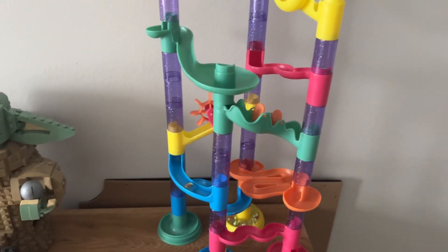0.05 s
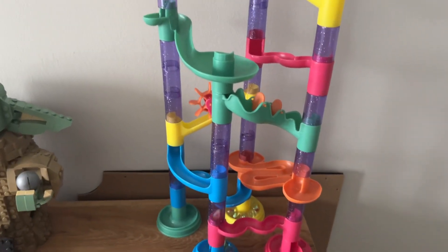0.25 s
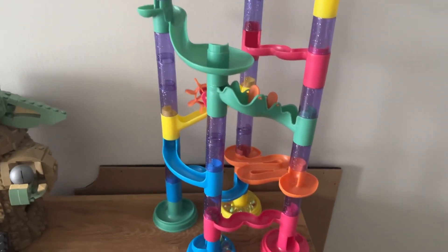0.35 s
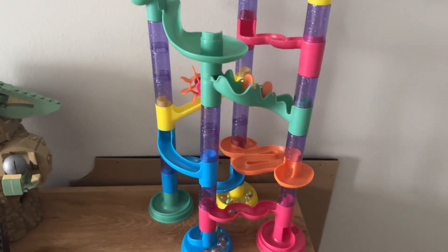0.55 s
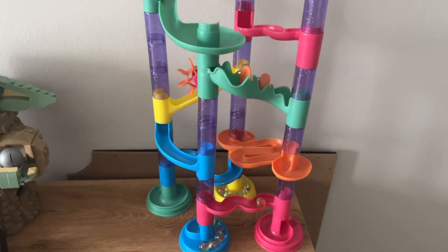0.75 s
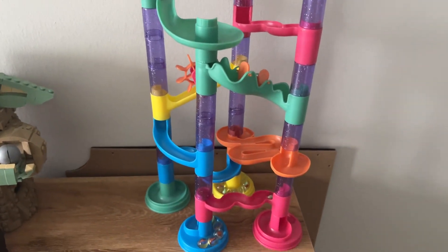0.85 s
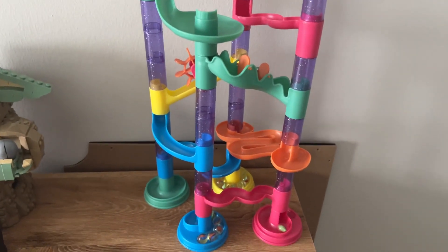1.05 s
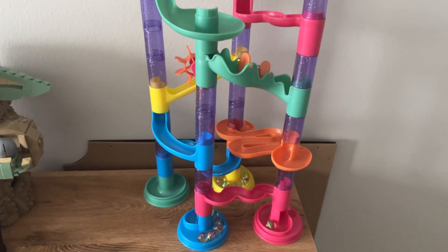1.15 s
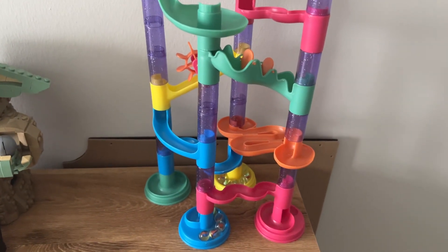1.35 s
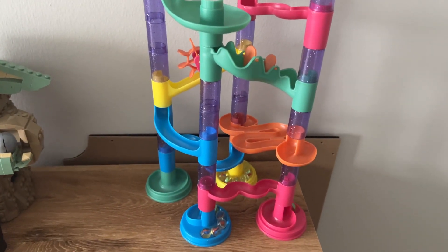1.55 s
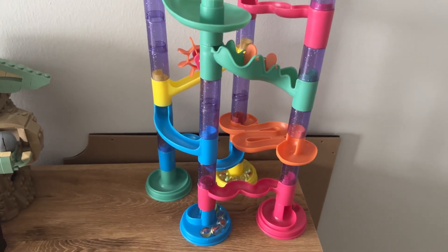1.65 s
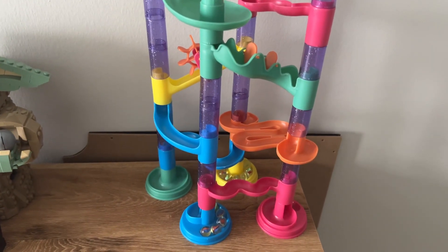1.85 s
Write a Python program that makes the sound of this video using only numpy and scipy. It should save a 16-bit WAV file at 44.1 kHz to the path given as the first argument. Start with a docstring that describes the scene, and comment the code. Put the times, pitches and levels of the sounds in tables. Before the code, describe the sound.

Glass marbles clack and roll down a plastic toy track in a quiet room.

```python
"""In a quiet room, glass marbles run down a plastic toy track on a wooden table.
They drop through tubes and bounce on the chutes and in the round base. Each blow makes the plastic
ring and clack, the glass tick and the table thump. Tiny bumps under the rolling marbles add a faint
rattle, and the room gives a short echo. One marble whirrs round the bowl, then the rolling dies away."""
import sys
import numpy as np
from scipy import signal
from scipy.fft import rfft, irfft
from scipy.io import wavfile

SR = 44100
rng = np.random.default_rng(int(sys.argv[2]) if len(sys.argv) > 2 else 0)


def log_audio(samples):
    """Write samples as a 16-bit WAV file to the path given in sys.argv[1]."""
    # one column per channel
    frames = np.atleast_2d(samples).T
    # limit to full scale, then quantise
    limited = np.clip(frames, -1, 1)
    pcm = np.round(limited * 32767).astype(np.int16)
    wavfile.write(sys.argv[1], SR, pcm)


N = 83790
TIME = np.arange(N) / SR


def from_db(db):
    """Turn decibels into a number to multiply a sound by."""
    return 10 ** (np.asarray(db) / 20)


def rms_one(x):
    """Scale a sound so that its average power is 1."""
    return x / np.sqrt(np.mean(x ** 2) + 1e-20)


def at_hz(points, hz):
    """Read between the rows of a table, giving every octave the same width."""
    freqs, values = np.transpose(points)
    return np.interp(np.log(np.maximum(hz, 1)), np.log(freqs), values)


def dying(t60):
    """A fade that starts at 1 and drops 60 dB every t60 seconds."""
    return from_db(-60 * TIME / t60)


def convolve(x, response):
    """Let every sample of x set off its own copy of a stereo response."""
    return signal.fftconvolve(np.atleast_2d(x), response, axes=1)[:, :N]


# How alike left and right sound: f/Hz, likeness (1 the same, -1 opposite)
LIKENESS = [(100, 0.92), (500, 0.66), (1400, -0.096), (3000, 0.058), (4800, -0.34), (6500, 0.63),
            (9000, -0.69), (12000, 0.14)]
def noise(colour, likeness=LIKENESS):
    """Stereo noise; its colour table says how strong the low and high pitches are."""
    hz = np.arange(N // 2 + 1) * SR / N
    mid, side = rfft(rng.standard_normal((2, N)))
    alike = np.clip(at_hz(likeness, hz), -1, 1)
    left_right = np.sqrt(1 + alike) * mid + np.sqrt(1 - alike) * side * [[1], [-1]]
    return rms_one(irfft(from_db(at_hz(colour, hz)) * left_right, N))


def bursts(times, levels_db, colour, rise_s, t60):
    """Tones too crowded to tell apart sound like noise: each blow swells it, then it fades."""
    power = np.zeros(N)
    np.add.at(power, (np.array(times) * SR).astype(int), from_db(levels_db) ** 2)
    shape = np.minimum(TIME / rise_s, 1) * dying(t60)
    loudness = np.sqrt(np.abs(signal.fftconvolve(power, shape ** 2)[:N]))
    return loudness * noise(colour)


def thin(x):
    """Cut the bass, as small plastic parts give off little below their lowest tones."""
    return signal.sosfilt(signal.butter(5, 1020, "high", fs=SR, output="sos"), x)


# Marbles hitting the track: t/s, part hit, ring level/dB, clack level/dB, tick level/dB
# (levels in all tables are relative: the functions scale them)
BLOWS = [(0.0, "chute", -31, -28, -56), (0.163, "chute", -29.5, -37, -61),
         (0.2098, "tube", -15.5, -17, -32), (0.2237, "tube", -15, -21.5, -36.5),
         (0.248, "chute", -26, -20, -30), (0.275, "chute", -28, -11.5, -23),
         (0.2826, "chute", -10, -13, -23.5), (.292, "chute", -12.5, -28, -29),
         (0.3009, "chute", -7.5, -16.5, -24.5), (0.307, "chute", -13, -20, -22.5),
         (0.3213, "chute", -12.5, -18.5, -29.5), (0.334, "chute", -21, -47, -51),
         (0.361, "chute", -18.5, -33, -66), (0.489, "chute", -31.5, -42, -78),
         (0.6757, "bowl", -45, -35.5, -65), (0.687, "chute", -34, -42, -62),
         (0.795, "base", -35.5, -42, -64), (0.823, "bowl", -45.5, -62, -51.5),
         (0.8372, "base", -35, -48, -65), (0.8441, "base", -25.5, -32.5, -45),
         (0.9129, "base", -34, -42, -75), (.940, "tube", -15.5, -18, -26),
         (0.9806, "base", -10, -12, -20.5), (1.005, "base", -31.5, -28.5, -47.5),
         (1.022, "base", -34.5, -37.5, -59.5), (1.0464, "bowl", -21, -35, -32.5),
         (1.0613, "base", -10.5, -17, -20), (1.084, "bowl", -23, -26.5, -41.5),
         (1.102, "base", -23, -31.5, -42), (1.272, "bowl", -34.5, -42.5, -53.5),
         (1.4277, "bowl", -26, -33, -47.5), (1.435, "base", -29, -36, -49.5),
         (1.49, "bowl", -27, -36.5, -48.5), (1.4948, "bowl", -21, -28, -45.5),
         (1.527, "base", -31, -42, -58), (1.578, "bowl", -37.5, -63.5, -80),
         (1.616, "bowl", -40, -61.5, -83), (1.628, "base", -36.5, -73.5, -64),
         (1.670, "base", -43, -71.5, -87)]
def marble_blows():
    """Each hit makes four sounds at once: a ring, a clack, a tick and a thump."""
    times, _, ring_db, _, tick_db = zip(*BLOWS)
    rings = np.zeros((2, N + SR))
    for start_s, part, force_db, _, _ in BLOWS:
        ring = plastic_ring(part, force_db)
        start = int(start_s * SR)
        rings[:, start:start + ring.shape[1]] += from_db(1) * ring
    return rings[:, :N] + plastic_clacks(BLOWS) + glass_ticks(times, tick_db) + thumps(times, ring_db)


RING_T60_S, LEFT_LEAD_S = .033, .00005   # how fast a ring fades; the left side hears it a bit sooner
# The tones that each plastic part rings with: f/Hz, level/dB
PART_TONES = {"tube": [(1190, -6), (1370, -7), (1630, -5.5), (2550, -10), (3080, -12.5), (4470, -13),
              (6100, -3), (6720, 0)], "chute": [(1032, -19), (1205, -15.5), (1338, -7), (1475, -4),
              (1710, -5), (2550, -12), (3300, -14), (4720, -10.5), (4975, -11.5), (6005, -9.5),
              (6495, -11.5)], "base": [(1160, -11.5), (1430, -4.5), (1600, 1), (1895, -6), (2185, -8),
              (3000, -13.5), (3290, -10), (4500, -7), (6280, -13.5)], "bowl": [(1020, -9), (1160, -7),
              (1280, -4), (1475, -1.5), (1765, -13.5), (1920, -1), (2250, -5.5), (3300, -7.5)]}
def plastic_ring(part, force_db, pitch=1):
    """A part rings; the spot hit sets each tone's strength and how it reaches left and right."""
    count = SR // 5
    tones, t = np.zeros((2, count)), TIME[:count]
    for hz, db in PART_TONES[part]:
        strength, phase, spread, detune = rng.standard_normal(4)
        hz = hz * pitch * (1 + .01 * detune)
        side_gap_rad = 2 * np.pi * hz * LEFT_LEAD_S + .35 * hz / 1500 * np.tanh(2 * spread)
        side_phases = .5 * phase + side_gap_rad * np.array([[.5], [-.5]])
        blow_db = force_db * (1 + .2417 * np.log2(hz / 1500))   # lighter blows sound duller
        tones += from_db(db + blow_db + strength) * np.sin(2 * np.pi * hz * t + side_phases)
    contact_s = .0003 * np.exp(-.0728 * force_db)   # lighter blows touch longer and start softly
    fade_in = np.sin(np.pi / 2 * np.minimum(t / contact_s, 1)) ** 2
    return thin(tones * dying(RING_T60_S)[:count] * fade_in)


# The colour of each part's clack: f/Hz, level/dB
CLACK_COLOURS = {"tube": [(330, -6.5), (680, -15), (1200, -3), (3200, 1), (4500, -3), (5300, -13.5),
                 (6500, 2), (7500, -16), (12000, -26.5)], "chute": [(250, -12.5), (720, -12.5),
                 (1100, -3.5), (3300, 1.5), (4000, -1.5), (4900, 1.5), (5500, -7.5), (6500, -1),
                 (7700, -12.5), (12000, -24.5)], "base": [(720, -20.5), (1100, -10), (2400, -6.5),
                 (3100, 6.5), (3800, -5.5), (4500, -0.5), (5400, -10), (6600, -4.5), (7700, -12.5),
                 (12000, -32)], "bowl": [(750, -20.5), (1200, -7.5), (2200, 7.5), (3400, -2), (4000, -3),
                 (9000, -12), (12000, -46.5)]}
def plastic_clacks(blows):
    """The many crowded tones of a struck part blur into one hard, bright crack."""
    clacks = 0
    for part, colour in CLACK_COLOURS.items():
        times, _, _, clack_db, _ = zip(*[blow for blow in blows if blow[1] == part])
        clacks = clacks + bursts(times, clack_db, colour, rise_s=.0017, t60=.064)
    bass_cut = signal.butter(2, 200, "high", fs=SR, output="sos")
    return from_db(-3.5) * signal.sosfilt(bass_cut, clacks)


# The colour of the glassy tick: f/Hz, level/dB
TICK_COLOUR = [(5000, -16), (8700, 4.5), (10300, -16.5), (12200, 7.5), (14000, -4), (15200, -5),
               (16500, -20)]
def glass_ticks(times, tick_db):
    """Glass gives a very short, high tick as it hits."""
    return from_db(3.5) * bursts(times, tick_db, TICK_COLOUR, rise_s=.00029, t60=.02)


# The colour of the shaken track tower and table: f/Hz, level/dB
THUMP_COLOUR = [(70, -40.5), (120, -7.5), (170, 4), (240, -11), (330, -12.5), (600, -12), (1000, -46)]
def thumps(times, ring_db):
    """Blows shake the tower and the table, but only hard ones stir them much."""
    thump_db = 1.25 * np.array(ring_db) - 30
    return bursts(times, thump_db, THUMP_COLOUR, rise_s=.006, t60=.26)


def bumps(per_s):
    """Tiny random jolts of a rolling marble, swelling as it swings from wall to wall."""
    sizes = from_db(3 * np.minimum(rng.exponential(1, N), 4))
    jolts = (rng.random(N) < per_s / SR) * rng.choice([-1, 1], N) * sizes
    swells_per_s, swell_db = 40, np.clip(4 * rng.standard_normal(N), -8, 8)
    return jolts * from_db(np.interp(TIME * swells_per_s, np.arange(N), swell_db))


# How loud the rolling is: t/s, level/dB
ROLL_LOUDNESS = [(0, -51.5), (.2, -53), (.45, -63), (.62, -54.5), (1.2, -56.5), (1.6, -60.5), (1.72, -70),
                 (1.9, -83)]
# The colour of its hiss: f/Hz, level/dB
HISS_COLOUR = [(300, -15), (750, -12), (3000, -7), (7000, -23), (10000, -43.5), (13000, -28.5)]
# The colour of the tower's hum: f/Hz, level/dB
HUM_COLOUR = [(90, -23), (165, 1), (215, -20.5), (330, -5), (440, -21.5), (500, -8), (1000, -38)]
def rolling():
    """Rolling marbles hiss, and their tiny bumps rattle the parts and hum through the tower."""
    rattle = 0
    for part in ("chute", "base", "bowl"):
        for stretch in (-1, 0, 1):   # three stretches of track sound together, each at its own pitch
            light_ring = plastic_ring(part, force_db=-41, pitch=.94 + .08 * stretch)
            rattle = rattle + convolve(bumps(per_s=220), light_ring)
    hiss = from_db(-4) * noise(HISS_COLOUR)
    hum = from_db(-7.5) * noise(HUM_COLOUR)
    loudness = from_db(np.interp(TIME, *np.transpose(ROLL_LOUDNESS)))
    return loudness * (rms_one(rattle) + hiss + hum)


# The colour of the room's background: f/Hz, level/dB
HUSH_COLOUR = [(20, -22), (45, -3), (62, 10), (85, -6.5), (165, 2.5), (600, -26.5), (3200, -25),
               (8000, -54)]
def room_hush():
    """A faint, low, steady noise fills the room."""
    return from_db(-62) * noise(HUSH_COLOUR)


# The colour of the echo's tail: f/Hz, level/dB
ECHO_COLOUR = [(150, -2), (600, 0), (1400, -14), (3000, -10.5), (6500, -5), (9000, -11), (13000, -46)]
# How long the tail takes to drop 60 dB: f/Hz, t/s
ECHO_FADE = [(150, 0.33), (1300, 0.5), (6000, 0.52), (13000, 0.3)]
# How alike the echo is left and right: f/Hz, likeness (1 the same)
ECHO_LIKENESS = [(600, 0.9), (1400, 0.63), (13000, .4)]
def room_echo(x):
    """Sound bounces quickly off wall and table, then each band of pitches fades at its own pace."""
    edges_hz, wall_delay_s = np.geomspace(80, 18000, 12), .0045
    white, response = noise([(1, 0), (SR, 0)], likeness=ECHO_LIKENESS), 0
    for low, high in zip(edges_hz, edges_hz[1:]):
        hz = np.sqrt(low * high)
        band = signal.sosfiltfilt(signal.butter(2, [low, high], "band", fs=SR, output="sos"), white)
        tail = from_db(at_hz(ECHO_COLOUR, hz)) * rms_one(dying(at_hz(ECHO_FADE, hz)))
        early = from_db(-4) * rms_one(dying(t60=.16)) / np.hypot(1, (hz / 9000) ** 2)
        response = response + band * np.hypot(tail, early) / np.sqrt(N)
    return convolve(x, response * (TIME > wall_delay_s))


# One marble circling the bowl: t/s, level/dB, centre f/Hz
CIRCLING = [(1.1, -53, 1150), (1.25, -49.5, 1140), (1.3, -48, 1520), (1.43, -49, 1450)]
def bowl_whirr():
    """Rapid bumps keep the bowl's tones ringing, most of all those near a moving centre pitch."""
    times, level_db, centres_hz = np.transpose(CIRCLING)
    centre_hz, whirr = np.interp(TIME, times, centres_hz), 0
    for hz, db in PART_TONES["bowl"]:
        tone = np.sin(2 * np.pi * hz * (TIME + [[LEFT_LEAD_S], [0]])) * dying(RING_T60_S)
        ringing = rms_one(convolve(bumps(per_s=2100), tone))
        octaves_away = np.abs(np.log2(hz / centre_hz))
        whirr = whirr + from_db(db - 16 * octaves_away) * ringing
    return thin(whirr) * np.interp(TIME, times, from_db(level_db), left=0, right=0)


def scene():
    """The marble track in its quiet room."""
    track = marble_blows() + rolling() + bowl_whirr()
    return track + room_echo(track) + room_hush()


def record(dry):
    """Cut the very highest treble: 70 dB down from 17200 Hz up."""
    return signal.sosfilt(signal.cheby2(12, 70, 17200, fs=SR, output="sos"), dry)


dry = scene()
out = record(dry)
log_audio(out)
```